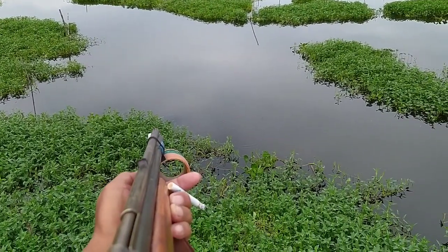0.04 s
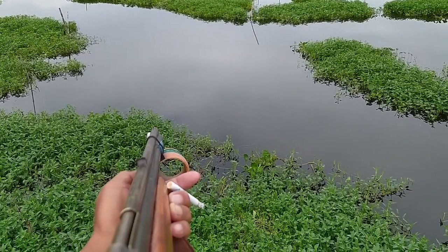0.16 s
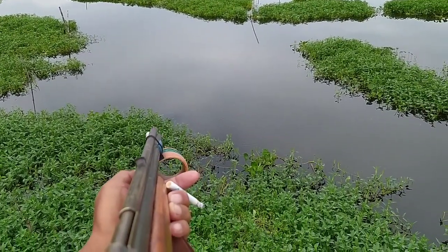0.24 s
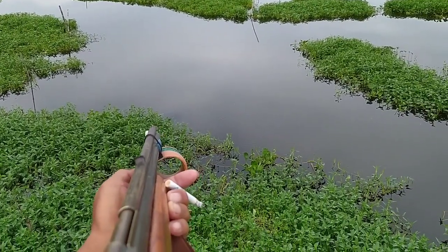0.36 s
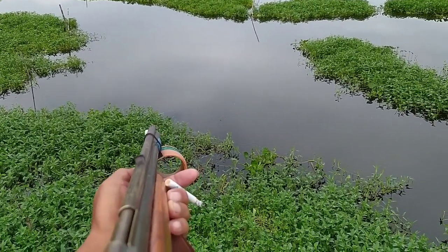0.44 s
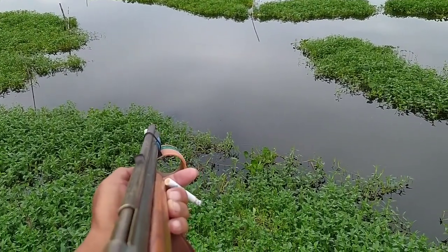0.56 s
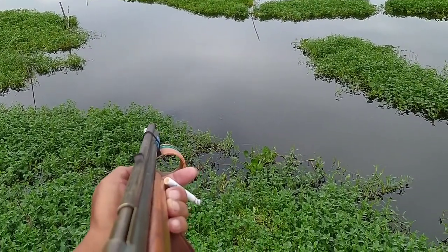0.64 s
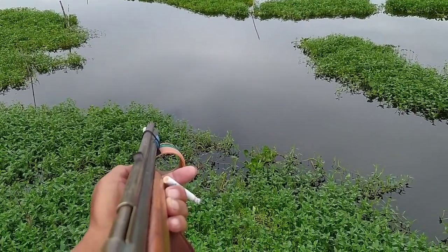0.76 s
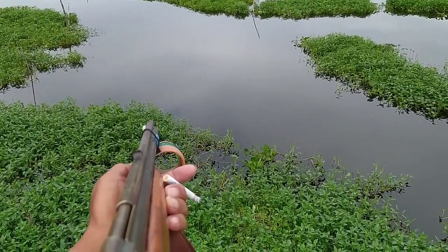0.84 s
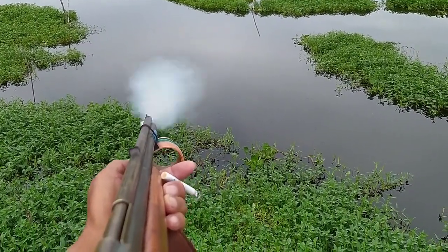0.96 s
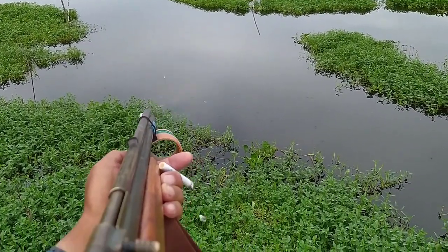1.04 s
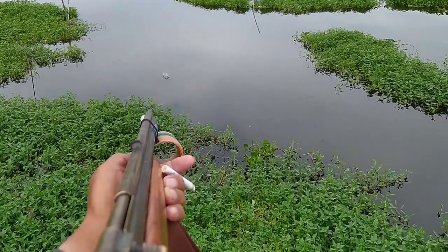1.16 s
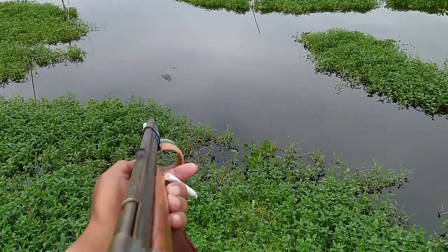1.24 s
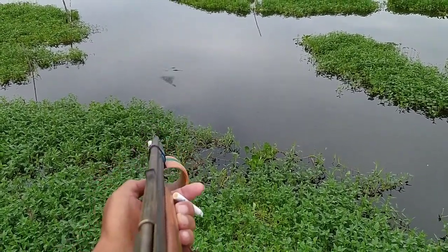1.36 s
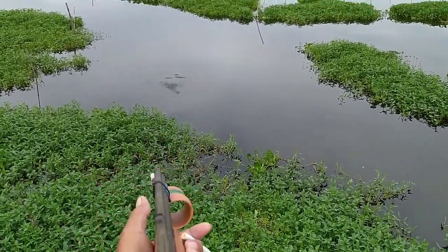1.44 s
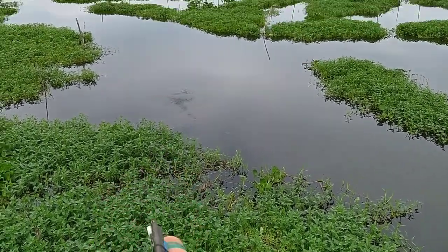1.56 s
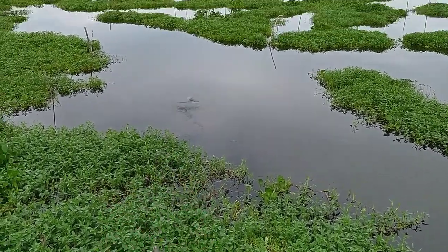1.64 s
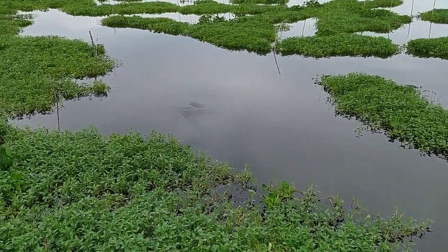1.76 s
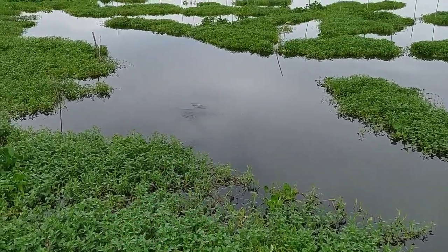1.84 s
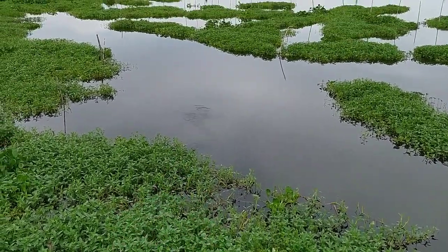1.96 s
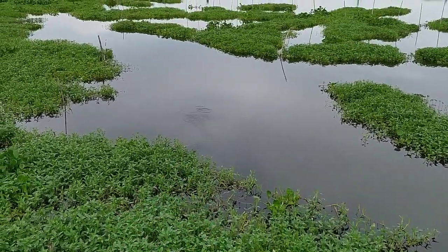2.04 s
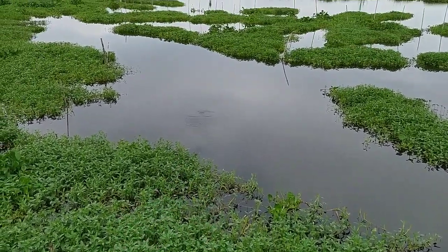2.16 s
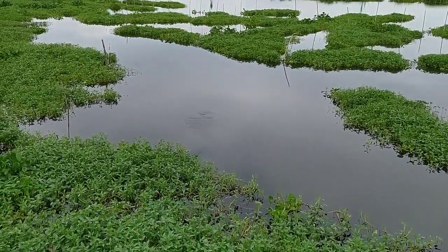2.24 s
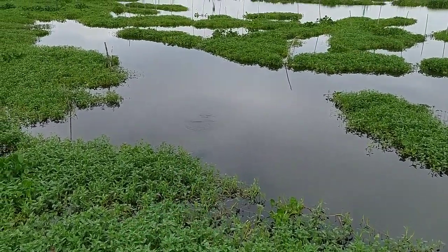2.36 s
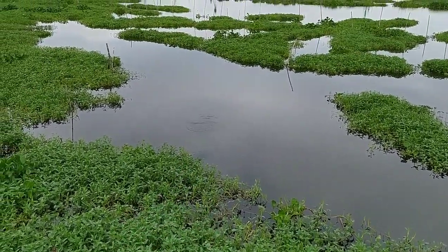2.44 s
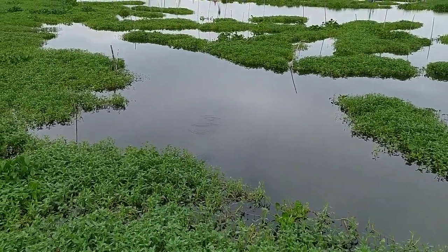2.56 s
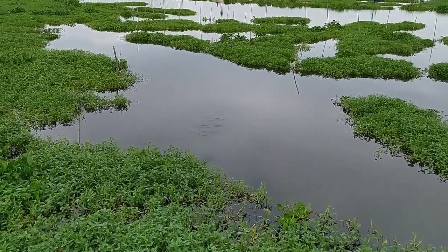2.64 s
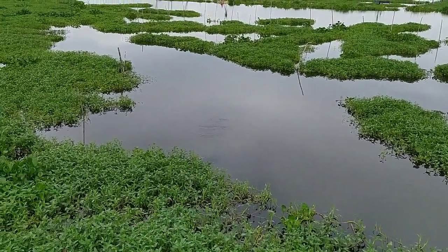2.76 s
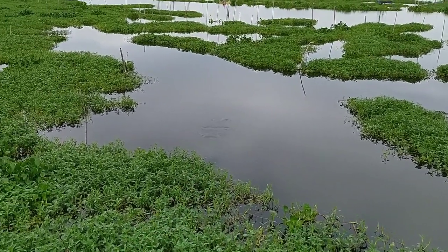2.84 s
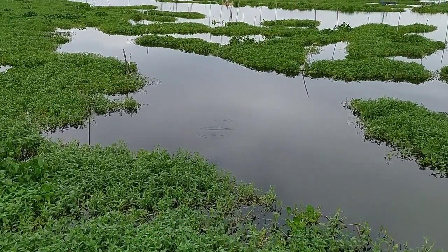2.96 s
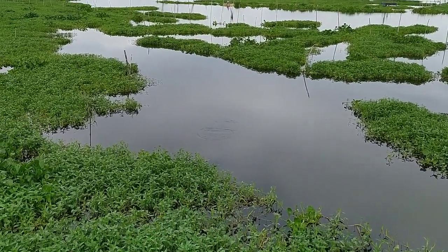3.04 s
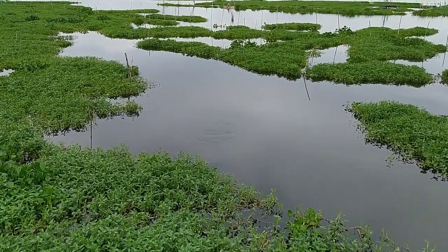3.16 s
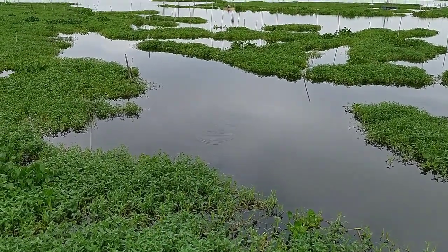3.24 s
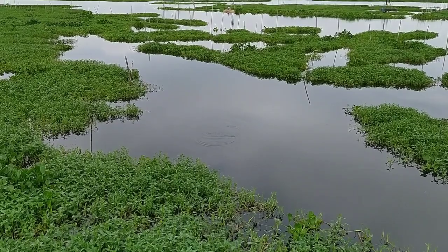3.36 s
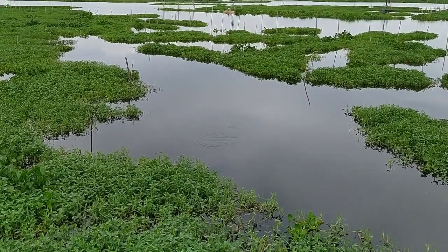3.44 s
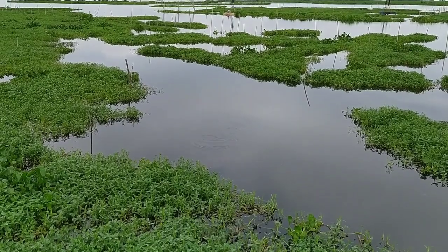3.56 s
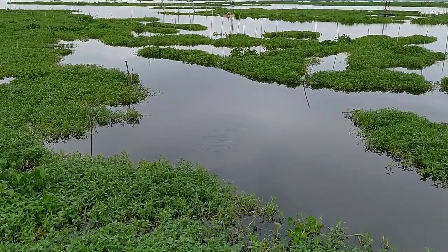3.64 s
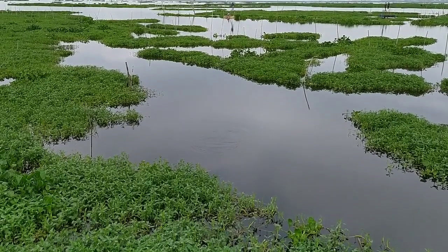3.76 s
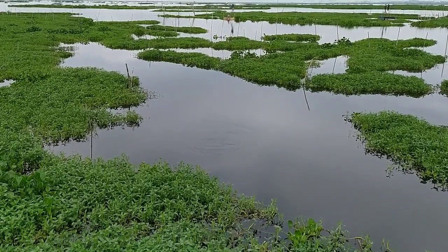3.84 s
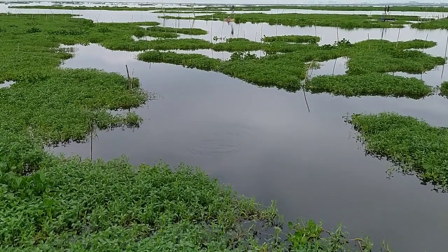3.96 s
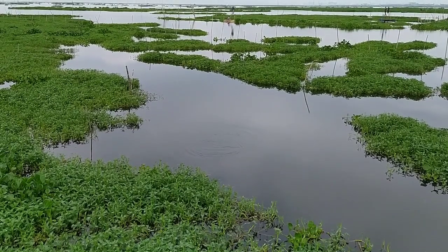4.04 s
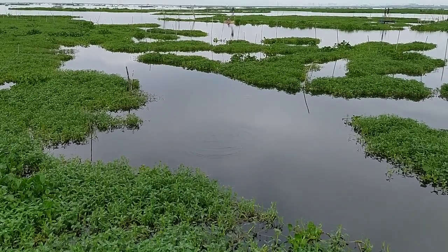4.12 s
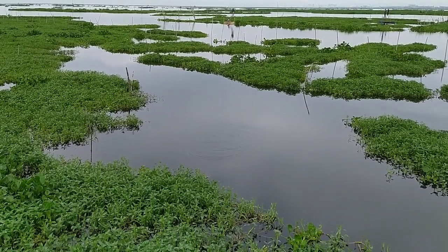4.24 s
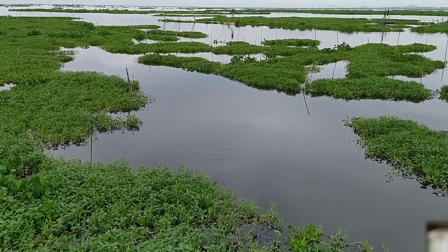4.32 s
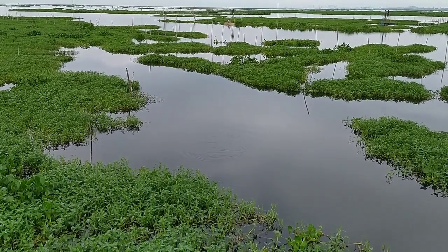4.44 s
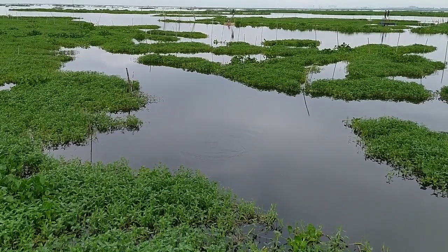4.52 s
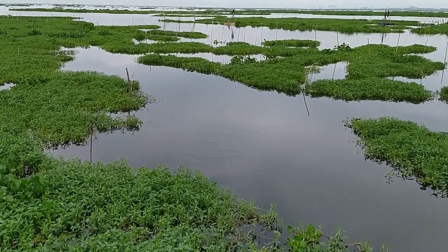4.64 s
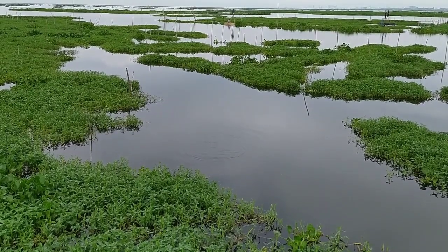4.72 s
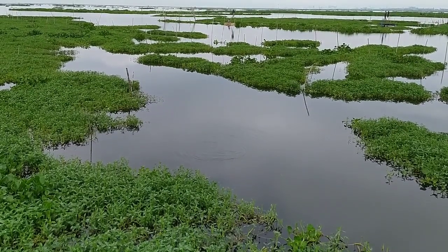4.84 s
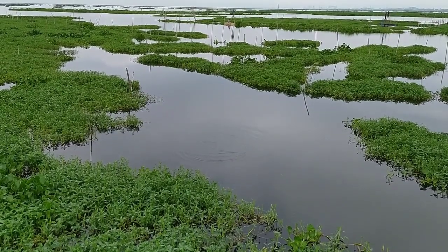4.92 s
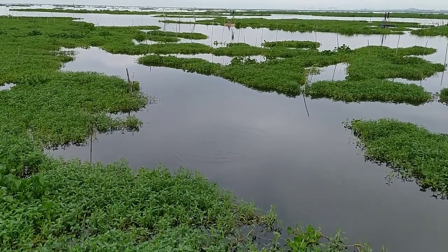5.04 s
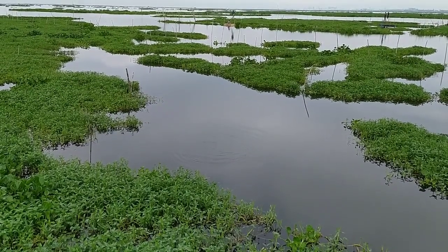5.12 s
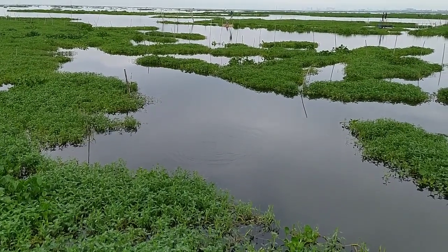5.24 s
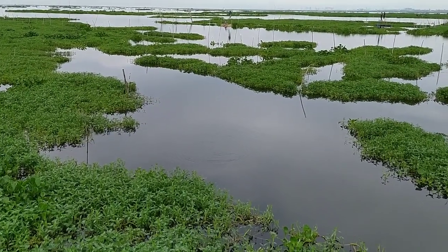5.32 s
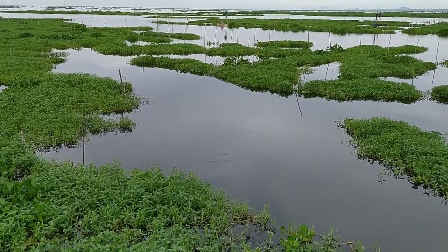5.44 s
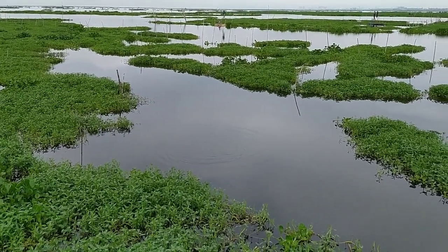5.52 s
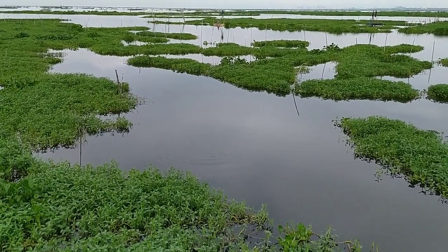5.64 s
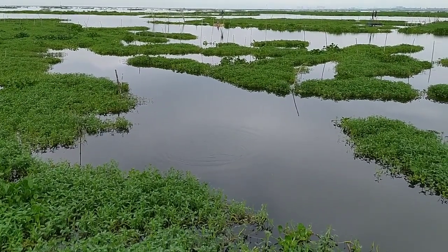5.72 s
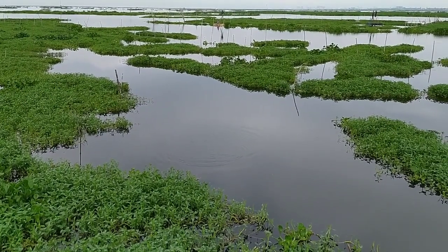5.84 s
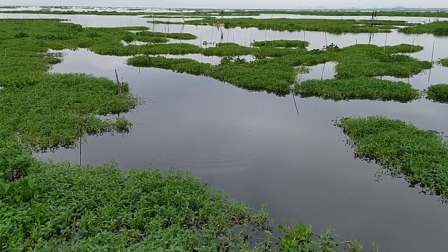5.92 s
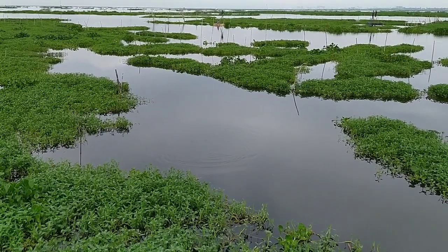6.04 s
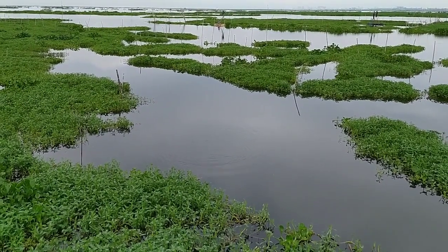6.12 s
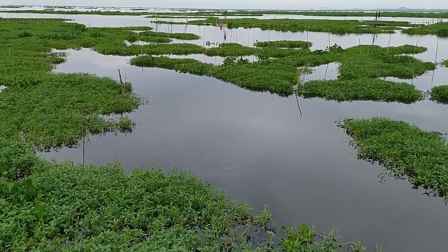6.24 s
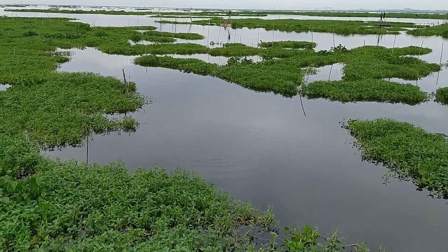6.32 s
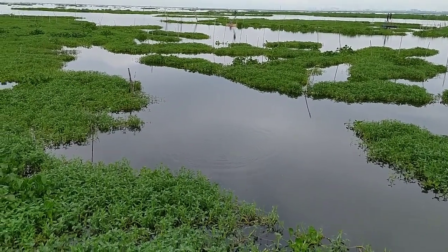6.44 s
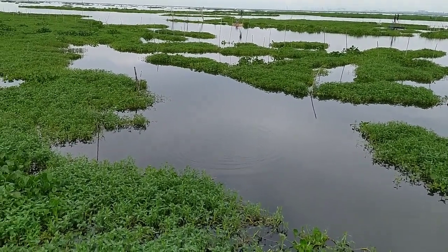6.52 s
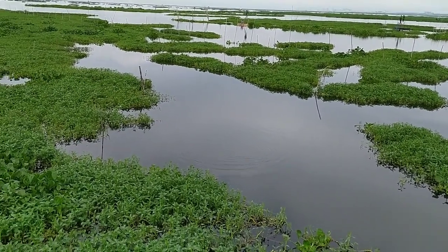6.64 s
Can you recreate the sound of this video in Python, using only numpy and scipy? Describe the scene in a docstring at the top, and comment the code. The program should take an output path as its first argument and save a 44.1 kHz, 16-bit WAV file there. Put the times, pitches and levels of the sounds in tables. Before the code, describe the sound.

One sharp, close spear gun shot and a small plop, followed by quiet handling clicks, with insects and light wind beside a lake.

```python
"""At the edge of a weedy lake, a stereo microphone close to a rubber-powered wooden spear gun.
A shrill insect chorus and light wind on the microphone run throughout. One second in, the gun fires:
the bands slap the stock, the jolt shakes the microphone, the line whips off its spool, the shaft plops
into the water and drops patter back. Then hands shift on the gun, ticking, brushing and twice knocking
the hollow stock; from 3.4 s small frogs chirp a few times in between."""
import sys
import numpy as np
from scipy import signal
from scipy.fft import rfft, irfft
from scipy.io import wavfile
from scipy.ndimage import uniform_filter1d

SR = 44100
rng = np.random.default_rng(int(sys.argv[2]) if len(sys.argv) > 2 else 0)


def waveform_to_disk(signal):
    """Save audio, clipped to [-1, 1], as 16-bit WAV at the path in sys.argv[1]."""
    frames = np.transpose(np.atleast_2d(signal))
    scaled = np.clip(frames, -1, 1) * 32767
    samples = np.round(scaled).astype(np.int16)
    wavfile.write(sys.argv[1], SR, samples)


N = 294499

# modes of the struck wooden stock: (frequency [Hz], half-width [Hz], level [dB])
STOCK_MODES = [(330.4, 160, -15), (527, 83, -13), (686, 140, 2), (945.5, 81, 9), (1165, 56, 6.5),
               (1380, 73, 5), (1643, 44, -3), (1774, 86, 2)]


def from_db(db):
    """Decibels to gain."""
    return 10 ** (np.asarray(db) / 20)


def rms_one(x):
    """Scale to rms 1."""
    return x / np.sqrt(np.mean(x ** 2) + 1e-20)


def in_time(rows):
    """Join (time, value) points into a curve over the scene."""
    return np.interp(np.arange(N) / SR, *np.transpose(rows))


def at_hz(points, hz):
    """Read (frequency, value) points on a log-frequency axis."""
    freqs, values = np.transpose(points)
    return np.interp(np.log(hz), np.log(freqs), values)


def bin_hz():
    """Frequencies of the FFT bins, at least 1 Hz."""
    return np.maximum(np.fft.rfftfreq(N, 1 / SR), 1)


def drift(rate_hz):
    """A smooth random wander of rms 1."""
    r = np.exp(-80 * np.pi * rate_hz / SR)
    slow = signal.lfilter([1], [1, -2 * r, r * r], rng.standard_normal(N // 40 + 2002))[2000:]
    return np.interp(np.arange(N) / 40, np.arange(len(slow)), rms_one(slow))


def resonate(x, hz, *widths):
    """Resonances of peak gain 1 in series, one for each width in Hz."""
    for width in widths:
        r = np.exp(-np.pi * width / SR)
        gain = (1 - r * r) / 2
        x = signal.lfilter([gain, 0, -gain], [1, -2 * r * np.cos(2 * np.pi * hz / SR), r * r], x + 1e-18)
    return x


def colour(x, spectrum):
    """Filter by a spectrum and scale to rms 1."""
    return rms_one(irfft(rfft(x) * from_db(at_hz(spectrum, bin_hz())), N))


def grains(per_s, spread_db, alike):
    """Random clicks of uneven size; both channels share the fraction `alike` of their power."""
    sizes = from_db(spread_db * np.minimum(rng.exponential(1, (3, N)), 5)) * rng.choice([-1, 1], (3, N))
    clicks = sizes * (rng.random((3, N)) < per_s / SR)
    return np.sqrt(alike) * clicks[0] + np.sqrt(1 - alike) * clicks[1:]


def sides(pan_db):
    """Left and right gains; pan is left minus right."""
    return from_db(np.array([[.5], [-.5]]) * pan_db)


def add_at(out, s, sound):
    """Mix a sound in from second s."""
    out[:, round(s * SR):][:, :sound.shape[-1]] += sound


def swells(rows):
    """Gain of each layer over time: every row rises to its levels, holds and falls; powers add."""
    t, power = np.arange(N) / SR, 0
    for s, rise, hold, fall, *levels_db in rows:
        shape_db = -rise * np.maximum(s - t, 0) - fall * np.maximum(t - s - hold, 0)
        power = power + from_db(np.c_[levels_db]) ** 2 * from_db(np.maximum(shape_db, -150)) ** 2
    return np.sqrt(power)


def patchy(x, rate_hz, depth_db=1.5):
    """Half-octave bands swell and fade on their own."""
    spectra, out = rfft(x), 0
    position = np.clip(2 * np.log2(bin_hz() / 350), 0, 11)
    for band in range(12):
        share = np.clip(1 - np.abs(position - band), 0, 1)
        out = out + from_db(depth_db * drift(rate_hz)) * irfft(spectra * share, N)
    return out


def insects(count, click_hz=257.3, throb_hz=10):
    """Singers left and right send click trains through a sharp body ring; each kind throbs in loose step."""
    # body resonance of the two kinds: (frequency [Hz], width [Hz], level [dB])
    tymbals = [(6993, 460, 3), (7970, 920, 0.5)]
    # the whole chorus: (time [s], level [dB])
    levels = [(0.0, -46), (1.1, -44.5), (1.5, -47), (2.8, -45.5), (3.3, -45), (4.1, -46.5), (4.9, -44.5),
              (5.3, -46.5), (6.68, -45)]
    out = np.zeros((2, N))
    throbs = [2 * np.pi * throb_hz * np.cumsum(1 + 0.15 * drift(1.9)) / SR for _ in tymbals]
    for k, (pace, lag, tune) in enumerate(rng.standard_normal((count, 3))):
        kind = k // 2 % 2
        hz, width, db = tymbals[kind]
        beats = np.cumsum(click_hz * (1 + 0.099 * pace + 0.075 * drift(30))) / SR
        clicks = np.diff(np.floor(beats), prepend=0) * (1 + .4 * rng.standard_normal(N))
        gain = from_db(db + 1.7 * np.sin(throbs[kind] + lag / 2) + 3.4 * drift(35))
        own_ring = resonate(clicks, hz + .4 * width * tune, 260)
        out[k % 2] += gain * resonate(own_ring, hz, width)
    shrill_band = signal.butter(3, [6200, 8850], "band", fs=SR, output="sos")
    return from_db(in_time(levels)) * rms_one(signal.sosfilt(shrill_band, out))


def wind():
    """Wind on the microphone: half-octave bands of lumpy noise, alike in both channels only in the bass."""
    # the rumble: (frequency [Hz], level [dB])
    spectrum = [(12, -32), (20, -0.5), (60, -1), (123, -4.5), (151, -3), (199, -6.5), (248, -13),
                (300, -16), (670, -27.5), (718, -25), (1200, -49.5), (1560, -45), (2640, -120)]
    # likeness of left and right: (frequency [Hz], correlation [0-1])
    likeness = [(40, 0.038), (130, 1), (290, 0.4), (640, 0.16), (3000, 0.064)]
    # strength of the wind: (time [s], level [dB])
    levels = [(0.0, -49), (1.08, -49.5), (1.45, -49), (1.92, -48), (3.16, -49), (4.22, -50), (4.89, -47),
              (5.24, -49), (5.67, -45), (6.0, -47.5), (6.68, -47)]
    out, gust, lumps = 0, drift(4), drift(10.5)
    edges_hz = 18 * 2 ** np.arange(0, 7, .5)
    white = rng.standard_normal((2, 2, N))
    for k, (low, high) in enumerate(zip(edges_hz, edges_hz[1:])):
        band = signal.butter(2, [low, high], "band", fs=SR, output="sos")
        mid, side = signal.sosfilt(band, white[k % 2])
        hz = np.sqrt(low * high)
        alike = at_hz(likeness, hz)
        gain = from_db(at_hz(spectrum, hz) + 0.5 * gust + 0.75 * lumps + 1.5 * drift(3.2))
        out = out + gain * (np.sqrt(1 + alike) * mid + np.sqrt(1 - alike) * side * [[1], [-1]])
    return from_db(in_time(levels)) * rms_one(out)


def far_hiss(level_db=-58.5):
    """A faint, nearly steady hiss in the distance."""
    # the hiss: (frequency [Hz], level [dB])
    spectrum = [(300, -40.5), (500, -19.5), (800, -11), (1500, -6.5), (2800, -7.5), (5800, -13), (9200, -2),
                (11100, -2), (12500, -8.5), (13900, -4), (15700, -12), (16500, 2.5)]
    return from_db(level_db + 0.28 * drift(11)) * colour(grains(8000, 1.5, 0.083), spectrum)


def ticks(rise_s=.0018, bright_share=.45):
    """Fingers and line tick on the gun: a contact and a brief scratch, with a short ring and bright edge."""
    # (time [s], level [dB], main ring [Hz], upper rings [dB], edge [dB], scratch decay [s], pan [dB])
    touches = [(0.613, -59, 2300, -1, -20, 0.015, 2), (1.461, -41, 1370, -21, 1, 0.011, -6),
               (1.7808, -51.5, 1405, 4, 14, 0.0047, 2), (1.976, -44.5, 1458, -17, -15, 0.016, 2),
               (2.136, -47, 1370, -16, 0, 0.01, 1), (2.157, -49.5, 1325, -24.5, -1, 0.0034, 3.5),
               (2.423, -45, 1220, -19.5, -11, 0.007, 1), (2.715, -53.5, 1490, -8.5, -9, 0.003, -0.5),
               (2.8754, -53, 1680, -12, -18.5, 0.0017, 5), (3.03, -57, 1975, -12, -20, 0.008, 0),
               (3.2861, -46, 1530, -19, -16, 0.0089, -5), (3.3302, -41, 3370, -8, 4, 0.00075, -5),
               (3.3326, -23, 2040, -5, -5.5, 0.0011, 3.5), (3.387, -57.5, 1130, -1, 17, .005, 2),
               (3.7, -51.5, 1140, -3, 1.5, 0.0058, -1), (3.9428, -56, 1520, -16, 1, 0.001, -4),
               (3.9468, -36.5, 1110, -28, -15, 0.0039, 15), (4.0797, -56, 1000, -9, 21, 0.0049, 0.5),
               (4.4817, -59, 991, -12.5, 29, 0.005, -11.5), (4.527, -56.5, 1384, 9, -5, .0034, 0.5),
               (4.575, -41.5, 1290, 4, 8, 0.011, 0), (4.9894, -36.5, 1420, 1, -33, 0.014, 2),
               (5.0112, -38, 1600, 3, -12, 0.0092, -3), (5.028, -40, 1390, -14.5, 0, 0.0042, -3.5),
               (5.213, -47.5, 1618, 6, -9, 0.0069, 1), (5.5249, -41.5, 1630, 12.5, -13, 0.019, 3),
               (5.53, -40.5, 1696, 7, -27.5, 0.0051, -11), (6.1611, -43.5, 1381, 3, -17, 0.019, -1),
               (6.399, -40.5, 1330, 1, -3.5, 0.0077, -7.5)]
    # further rings, all but one above the main ring: (frequency [ratio], level [dB])
    overtones = [(.45, -2.5), (1.751, 8), (2.6, -6), (3.4, 2.5)]
    out, t = np.zeros((2, N)), np.arange(3000) / SR
    for s, level_db, hz, upper_db, edge_db, scratch_s, pan_db in touches:
        burst = rng.standard_normal((2, len(t))) * np.exp(-t / scratch_s) * np.minimum(t / rise_s, 1)
        burst[:, round(.001 * SR)] = 12   # firm first contact
        bright = burst * np.exp(-t / scratch_s * (1 / bright_share - 1))   # dies sooner
        width = np.hypot(480, 1.2 / scratch_s)   # a briefer scratch damps the ring
        body = resonate(burst, hz, width, 3.24 * width)
        upper = sum(from_db(db) * resonate(bright, hz * ratio, ratio * width) for ratio, db in overtones)
        edge = resonate(bright, 9540, 2300, 2300, 4600)
        parts = [(body, 0), (upper, upper_db), (edge, edge_db)]
        tick = sum(from_db(db) * part / np.abs(part).max() for part, db in parts)
        add_at(out, s, from_db(level_db) * tick * sides(pan_db))
    return out


def plops():
    """Bubbles in the lake ring as short gliding tones, most rising in pitch as they close."""
    # (time [s], start pitch [Hz], end pitch [Hz], length [s], level [dB])
    bubbles = [(0.837, 810, 870, 0.03, -56.5), (1.162, 524, 866, 0.022, -31.5),
               (1.579, 1254, 1140, 0.024, -59), (1.601, 1166, 1355, 0.057, -67),
               (1.614, 2590, 2550, 0.066, -63), (1.646, 1288, 1200, 0.049, -66),
               (2.152, 1317, 1330, 0.05, -61.5), (2.272, 895, 1090, 0.013, -57.5),
               (2.293, 980, 1130, 0.016, -59.5)]
    out = np.zeros((2, N))
    for s, start_hz, end_hz, length, level_db in bubbles:
        progress = np.arange(round(length * SR)) / (length * SR)
        phase = 2 * np.pi * np.cumsum(start_hz + (end_hz - start_hz) * progress) / SR
        add_at(out, s, from_db(level_db) * np.sin(np.pi * progress) * np.sin(phase))
    return out


def shot(shared_bass_hz=86.6):
    """Rubber batters the stock in a dense rattle over a dull thud; the line hisses as it runs out."""
    # In turn: the catch lets go, rubber hits the stock, slack bands flap, line runs out, the shaft
    # splashes in, water falls back, spray settles, the water swells back, the line's end flicks.
    # (time [s], rise [dB/s], hold [s], fall [dB/s], thud [dB], stock [dB], slap [dB], whip [dB])
    stages = [(0.993, 9000.5, 0.0071, 2501, -43, -21, -8.5, -21),
              (1.001, 4002, 0.03, 750.5, -17, -15, -13.5, -27),
              (1.035, 906, 0.013, 340, -52, -36, -18.5, -19),
              (1.075, 600.5, 0.04, 196, -68, -49.5, -34, -27.5),
              (1.127, 300, 0.054, 330, -67.5, -45.5, -36, -30),
              (1.19, 200, 0.025, 498, -64, -49, -38.5, -43), (1.235, 298, 0.012, 79, -69, -50, -45.5, -44),
              (1.475, 147, 0.0095, 48, -69, -58.5, -54, -54),
              (1.782, 197, 0.0026, 299, -65.5, -65.5, -63.5, -55.5)]
    # spectra of thud, band slap and line whip: (frequency [Hz], level [dB])
    thud_spectrum = [(41, -26.5), (70, -3.5), (220, -4), (318, -1), (509, -9), (561, -19), (700, -11.5),
                     (910, -39.5), (1540, -120)]
    slap_spectrum = [(710, -30.5), (1200, -19.5), (1240, -13), (1480, -6), (2980, -0.5), (3500, -9),
                     (3900, -8.5), (4290, -8), (9000, -2), (11700, -14.5), (13200, -24.5), (14800, -16),
                     (16000, -30.5)]
    whip_spectrum = [(2940, -32.5), (5000, -5), (5730, -10.5), (6130, -22.5), (6660, -8), (7380, -9),
                     (10900, 1.5), (12300, -7), (13200, -16), (15100, -15.5), (16000, -26)]
    # balance of the shot at the microphone: (frequency [Hz], pan [dB])
    balance = [(200, -2.5), (600, 1.5), (1500, -0.5), (5000, 2), (8500, 0), (11500, 3), (15000, 5)]
    thud = colour(grains(830, 1.2, 0.017), thud_spectrum)
    rattle = grains(1500, 1.7, 0.12)
    stock = rms_one(sum(from_db(db) * resonate(rattle, hz, 2 * half) for hz, half, db in STOCK_MODES))
    slap = colour(grains(4000, 4.7, 0.067), slap_spectrum)
    whip = colour(grains(6700, 4.9, 0.043), whip_spectrum)
    parts = [thud, stock, patchy(slap, rate_hz=36), patchy(whip, rate_hz=53)]
    spectra = rfft(sum(gain * part for gain, part in zip(swells(stages), parts)))
    hz = bin_hz()
    shared = 1 / (1 + (hz / shared_bass_hz) ** 4)   # the same deep bass reaches both sides
    return irfft((shared * spectra[0] + (1 - shared) * spectra) * sides(at_hz(balance, hz)), N)


def blows(decay_s=0.00076, sharpness=6.2):
    """The hardest blows of the shot: each is a short bright crack that also rings the stock."""
    # (time [s], level [dB], crack pitch [Hz], stock against crack [dB], pan [dB])
    hits = [(0.9942, -8.5, 7200, -14, -0.5), (0.9972, -12, 2600, -8, 1), (0.9998, -10.5, 9200, -8, -0.5),
            (1.012, -16, 1500, -3.5, -0.5), (1.0168, -12, 2000, -4, 0.5), (1.0272, -11, 8800, -7.5, -0.5),
            (1.0345, -13, 9500, -8.5, 0), (1.040, -13, 5200, -6, 0), (1.1245, -17, 10500, -14, 0)]
    out, t = np.zeros((2, N)), np.arange(2000) / SR
    for s, level_db, hz, stock_db, pan_db in hits:
        burst = rng.standard_normal((2, len(t))) * np.exp(-t / decay_s)
        crack = resonate(burst, hz, hz / sharpness)
        wood = sum(from_db(db) * resonate(burst, mode_hz, 2 * half) for mode_hz, half, db in STOCK_MODES)
        blow = crack / np.abs(crack).max() + from_db(stock_db) * wood / np.abs(wood).max()
        add_at(out, s, from_db(level_db) * blow * sides(pan_db))
    return out


def recoil():
    """The jolt swings the microphone membranes slowly to and fro."""
    # (time [s], level [dB], frequency [Hz], decay [s], direction [+1 or -1])
    swings = [(1.006, -23, 10.5, 0.057, -1), (1.024, -4.5, 41, 0.0046, -1), (1.063, -10.5, 2.83, 0.13, 1),
              (1.1, -6.5, 0.35, 0.089, -1)]
    out = np.zeros(N)
    for s, level_db, hz, decay, sign in swings:
        t = np.maximum(np.arange(N) / SR - s, 0)
        out += sign * from_db(level_db) * np.sin(2 * np.pi * hz * t) * np.exp(-t / decay)
    return out * sides(pan_db=4)


def drops(sharpness=22):
    """Drops patter back on the lake, each ringing a small bubble at one of 16 pitches."""
    # (time [s], rise [dB/s], hold [s], fall [dB/s], level [dB])
    showers = [(1.12, 400, 0.11, 150, -45.5), (1.3, 200, 0.035, 60, -68), (1.47, 300, 0.0826, 59, -62.5)]
    clicks, pitch_index = grains(300, 3.2, 0.22), rng.integers(0, 16, N)
    rings = sum(resonate(clicks * (pitch_index == k), hz, hz / sharpness) / np.sqrt(hz)
                for k, hz in enumerate(np.geomspace(1300, 5000, 16)))
    return swells(showers)[0] * rms_one(rings)


def brushing():
    """Hands brush along the gun: fine friction grains in three broad bands."""
    # (time [s], rise [dB/s], hold [s], fall [dB/s], low [dB], mid [dB], treble [dB])
    strokes = [(1.923, 204.5, 0.035, 127.5, -75.5, -70.5, -59),
               (2.46, 51.5, 0.026, 71.5, -63, -70.5, -76.5), (3.332, 73, 0.022, 96, -65.5, -68, -67.5),
               (4.56, 401.5, 0.034, 56.5, -70, -67, -62), (4.768, 86.5, 0.36, 89, -64, -73.5, -72),
               (5.015, 64, 0.027, 200, -81, -67, -65.5), (5.525, 396.5, 0.021, 52, -67, -66.5, -63),
               (6.344, 147.5, 0.13, 89.5, -66, -59.5, -56.5)]
    # low, mid and treble friction bands: (frequency [Hz], width [Hz])
    bands = [(1050, 950), (3300, 3600), (10300, 3700)]
    rub = grains(4000, 3.6, .15) * from_db(2.5 * drift(25))
    return sum(gain * rms_one(resonate(rub, hz, width, width))
               for gain, (hz, width) in zip(swells(strokes), bands))


def knocks():
    """Knocks ring the hollow stock while the grip damps it."""
    # (time [s], level [dB], damping by the grip [factor], brightness [dB/octave])
    hits = [(3.3348, -44, 3.5, 6), (3.946, -32, 1.12, -0.5)]
    # modes of the hollow: (frequency [Hz], level [dB], 60 dB decay before damping [s])
    hollow = [(293, -7.5, 0.12), (452, 2, 0.11), (700, -13, 0.075), (1140, -9, 0.065)]
    out, t = np.zeros((2, N)), np.arange(3000) / SR
    for s, knock_db, damping, tilt in hits:
        for hz, mode_db, t60 in hollow:
            start_db = knock_db + mode_db + tilt * np.log2(hz / hollow[1][0])
            add_at(out, s, from_db(start_db - 60 * damping * t / t60) * np.sin(2 * np.pi * hz * t))
    return out


def frogs(chirp_s=0.037, sag=.012, waver=.012, side_ratio=1.27):
    """Small frogs chirp: short, slightly rough whistles that sag in pitch and trail off."""
    # (time [s], level [dB], pitch [Hz], second harmonic [dB], side tone [dB], pan [dB], roughness [factor])
    calls = [(3.400, -58.5, 3630, -24, -17, 3, 1.6), (3.589, -63, 3640, -22, -8, 4, 1.1),
             (4.142, -64, 3620, -17, -10, 7, 1.1), (4.185, -74.5, 3670, -22, -6, 4, 1),
             (4.251, -66, 3610, -22, -6, 6, 1), (4.926, -39, 2647, -5, -37, -7.5, 0.4)]
    out = np.zeros((2, N))
    age = np.arange(3000) / SR / chirp_s
    progress = np.minimum(age, 1)
    shape = np.sin(np.pi * progress ** .5) ** 2 + .08 * progress * np.exp(-1.5 * age)   # pulse and trail
    for s, level_db, hz, second_db, side_db, pan_db, rough in calls:
        flutter = rough * 10 * uniform_filter1d(rng.standard_normal(len(age)), size=100)
        phase = 2 * np.pi * np.cumsum(hz * (1 - sag * (age - .4) + waver * flutter)) / SR
        whistle = np.sin(phase) + from_db(second_db) * np.sin(2 * phase)
        side_tone = from_db(side_db) * flutter * np.sin(side_ratio * phase)
        call = shape * (1 + .35 * flutter) * (whistle + side_tone)
        add_at(out, s, from_db(level_db) * call * sides(pan_db))
    return out


def rasp():
    """A drag swells into the second knock: uneven grains ring the resonances of the surface."""
    # (time [s], rise [dB/s], hold [s], fall [dB/s], low [dB], mid [dB], treble [dB])
    drags = [(3.876, 901, 0.0074, 250, -68, -53, -50), (3.916, 498, 0.0091, 604, -51, -48.5, -49),
             (3.928, 499, 0.017, 6004, -68, -44, -37), (3.9445, 2500, .002, 6000, -36, -35, -37),
             (3.954, 900, .012, 700, -55, -59, -56)]
    # surface resonances in low, mid and treble groups: (frequency [Hz], width [Hz], level [dB])
    groups = [
        [(1200, 650, 0)],
        [(1990, 750, -1), (3540, 650, -8.5), (4890, 540, -3.5)],
        [(7800, 9300, -8), (9370, 3600, 7), (14800, 2400, -17)],
    ]
    out, grit = 0, grains(6000, 3.2, 0.3)
    for gain, rings in zip(swells(drags), groups):
        ringing = sum(from_db(db) * resonate(grit, hz, width, 2 * width) for hz, width, db in rings)
        out = out + gain * rms_one(ringing)
    return out


def scene():
    """The gun close up, with the lake, its animals and the wind around it."""
    background = far_hiss() + insects(count=32)
    firing = shot() + blows() + recoil()
    lake = drops() + plops() + frogs()
    handling = ticks() + brushing() + knocks() + rasp()
    return background + firing + lake + handling + wind()


def record(dry, ceiling=.85, cutoff_hz=15750):
    """The recorder rounds the peaks and cuts the top treble steeply."""
    rounded = ceiling * np.tanh(dry / ceiling)
    return signal.sosfilt(signal.ellip(10, 1, 70, cutoff_hz, fs=SR, output="sos"), rounded)


dry = scene()
out = record(dry)
waveform_to_disk(out)
```